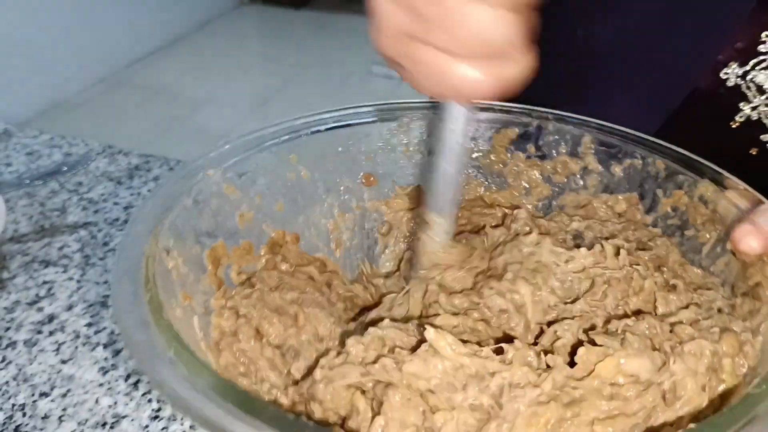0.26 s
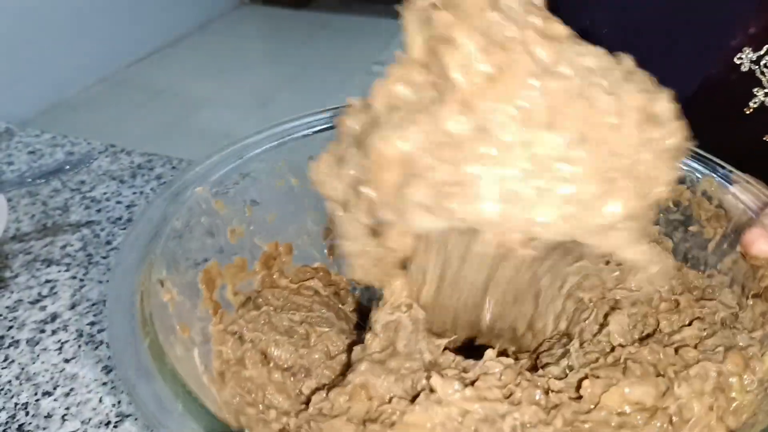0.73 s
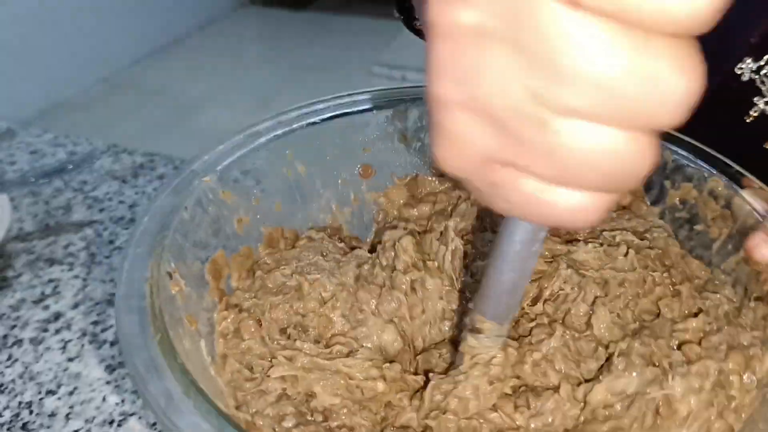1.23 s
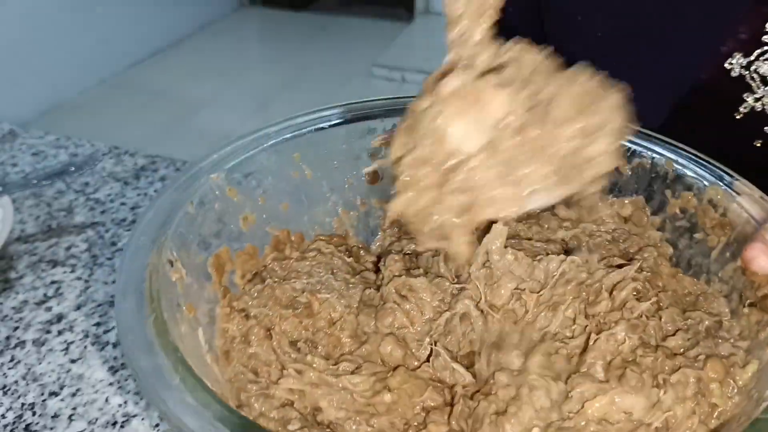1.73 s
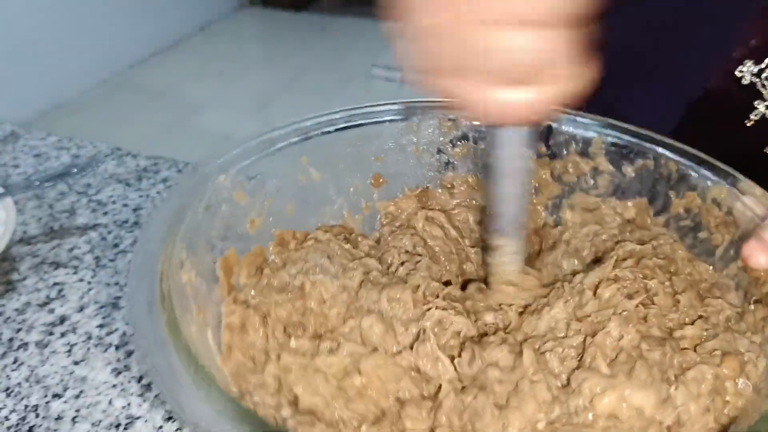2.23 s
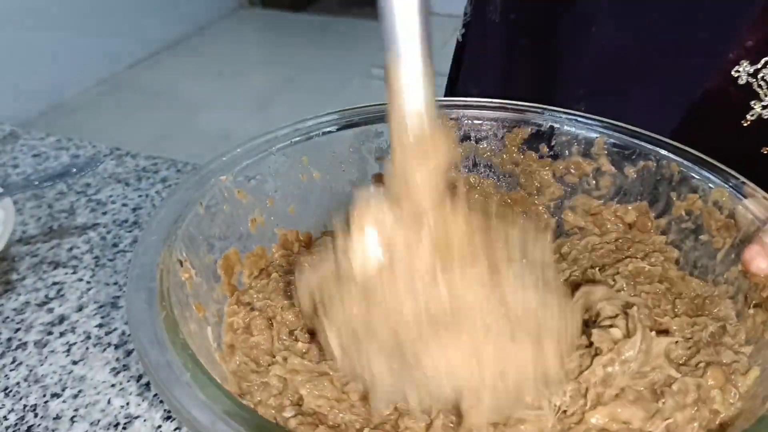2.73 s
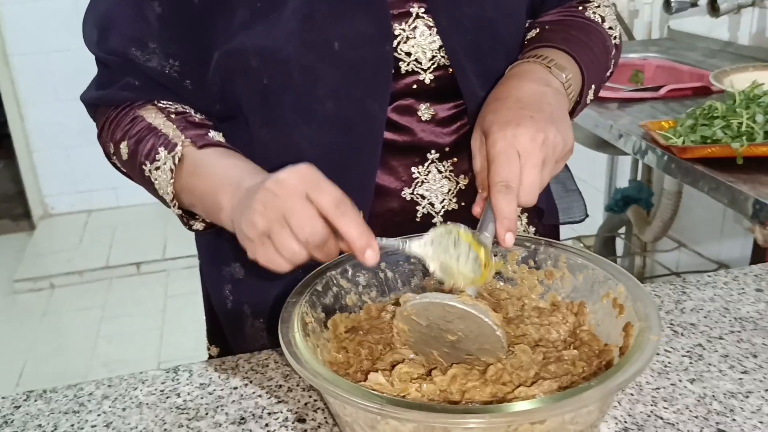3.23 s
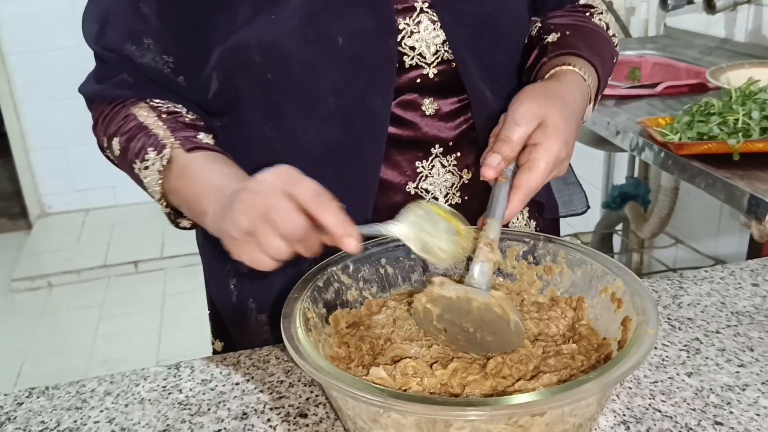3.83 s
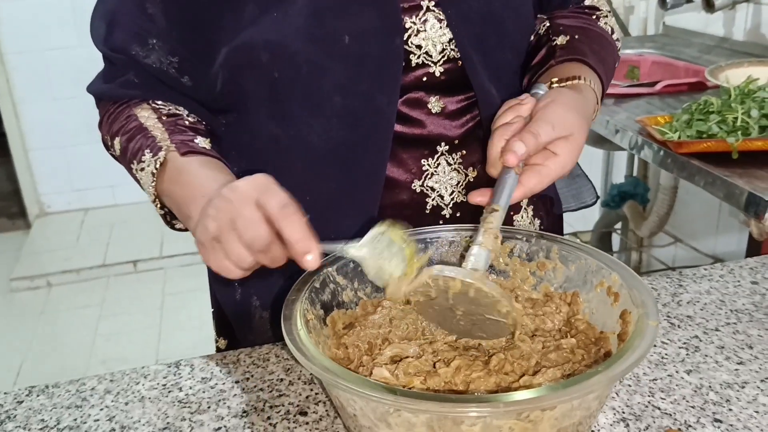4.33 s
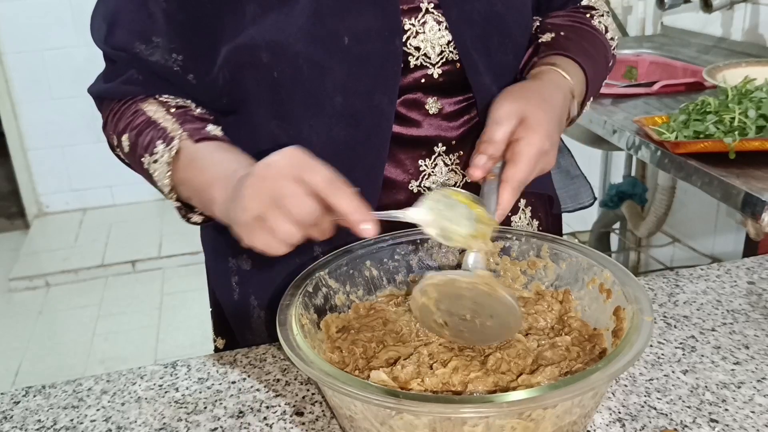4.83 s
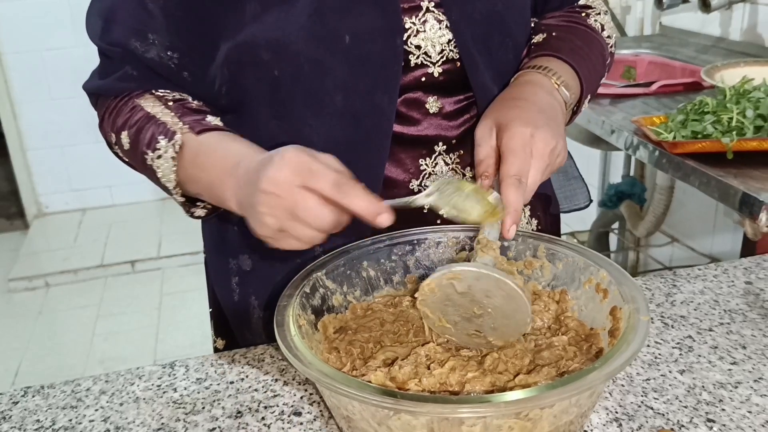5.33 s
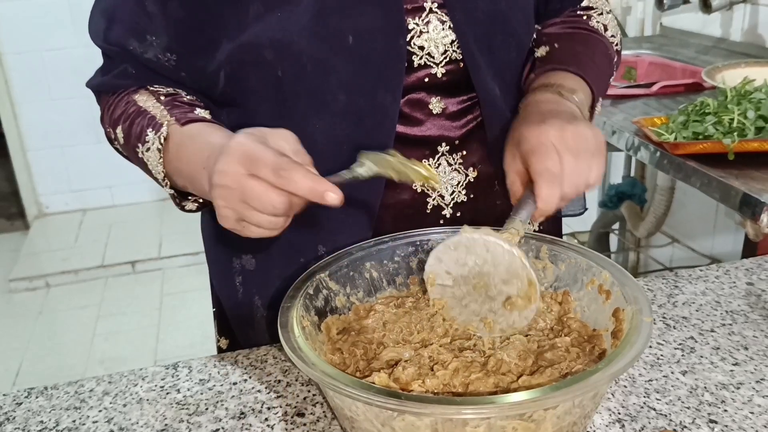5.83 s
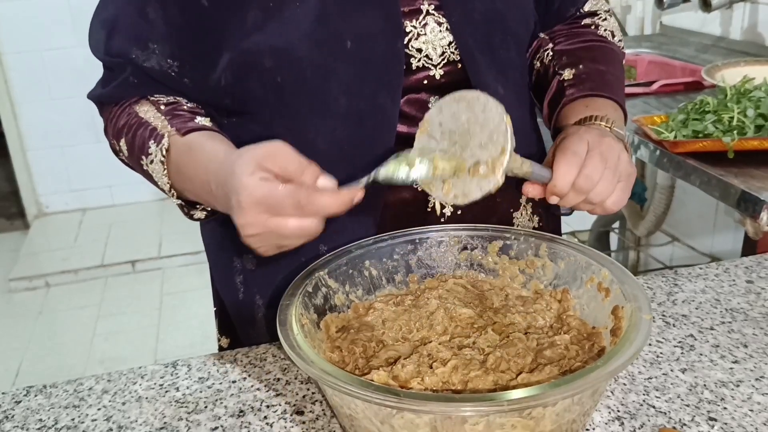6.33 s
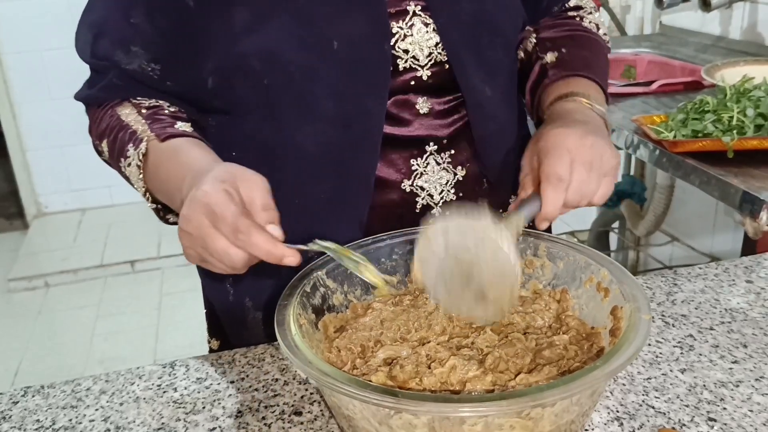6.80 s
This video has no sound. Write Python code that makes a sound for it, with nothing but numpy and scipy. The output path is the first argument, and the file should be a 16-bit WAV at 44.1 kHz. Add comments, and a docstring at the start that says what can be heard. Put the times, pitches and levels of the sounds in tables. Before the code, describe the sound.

In a small tiled kitchen with low hum and hiss, a steel ladle pushes through thick sticky mash in a glass bowl, squelching, crackling and popping. It knocks the glass irregularly, one early blow hugely louder than the rest. Then the background abruptly changes tone and a small spoon scrapes the ladle in nine strokes, each a short damped clink and gritty scrape. Close stereo microphone.

```python
"""Over a low hum and hiss in a tiled kitchen, a steel ladle works thick mash in a glass bowl on a stone counter.
The mash squelches and pops, as torn grains and short bursts; the ladle knocks the glass, as fading tones.
A blow that overloads both channels together makes a limiter dip the level briefly.
Then the background abruptly changes colour, and a small spoon clears the ladle stroke by stroke:
each is a clink of fading steel tones deadened by mash, then a short gritty scrape of random tiny slips."""
import sys
import numpy as np
from scipy import signal
from scipy.fft import rfft, irfft, next_fast_len
from scipy.io import wavfile
from scipy.ndimage import uniform_filter1d, minimum_filter1d

SR = 44100
rng = np.random.default_rng(int(sys.argv[2]) if len(sys.argv) > 2 else 0)


def master(y):
    """Save y as 16-bit WAV."""
    cut = np.clip(np.atleast_2d(y).T, -1, 1)
    pcm = np.round(cut * 32767)  # scale
    wavfile.write(sys.argv[1], SR, pcm.astype(np.int16))


N = 311338  # length in samples
COLOUR_CHANGE_S = 2.8  # when the background noise changes colour and the mash stops ticking

# All levels are relative settings, which the mix below adds to.
# spoon landing on the ladle, once a stroke: start_s, level_db, ring_hz, ring_level_db, brightness_db
SPOON_LANDINGS = [(2.8459, -17.5, 5360, -4.5, 3.5), (3.2848, -9.5, 4800, -13.5, -1.5),
                  (3.5775, -10.5, 5430, -2, -2.5), (3.9002, -8, 5400, -11, 1),
                  (4.187, -13.5, 5480, -11, -1), (4.5292, -10.5, 5480, -4, -1.5),
                  (4.9242, -19.5, 4350, -6, -9.5), (5.4011, -14.5, 4360, 9, 0.5),
                  (6.284, -7.5, 4600, -10, 1)]
# the slide after each landing: start_s, end_s, level_db, easing_in_mid_slide_db, brightness_db
SPOON_SLIDES = [(2.938, 2.997, -28, 6.5, -5), (3.314, 3.37, -27.5, 17, 0.5), (3.631, 3.699, -25.5, 3, -1),
                (3.924, 3.996, -32, -1.5, -23), (4.233, 4.31, -30, -6, -11), (4.557, 4.6, -23, 3, -6),
                (4.995, 5.029, -28, -0.5, -3), (5.429, 5.477, -33, 2, -4), (6.346, 6.397, -23.5, -1, 7.5)]
# high tones of the mash-coated steel: pitch_hz, level_db, time_to_fade_60_db_s
STEEL_HIGH_TONES = [(5930, 11, 0.0056), (7580, 6.5, 0.021), (8220, 4.5, 0.025), (9500, -9, 0.014),
                    (11400, -16, 0.027)]
# highest tones of the same steel: pitch_hz, level_db, time_to_fade_60_db_s
STEEL_HIGHEST_TONES = [(12260, -7.5, 0.025), (14300, 0, .01), (15800, -5, 0.029)]


def amp(db):
    """Turn decibels into a gain."""
    return 10 ** (np.asarray(db) / 20)


def unit(x):
    """Scale a sound to an rms (average strength) of 1."""
    return x / np.sqrt(np.mean(x ** 2) + 1e-20)


def along(points, hz):
    """Read a curve of (Hz, value) points, with pitch on a log scale."""
    point_hz, value = np.transpose(points)
    return np.interp(np.log(hz + 1), np.log(point_hz + 1), value)


def filtered(x, response):
    """Multiply each frequency in a sound by the response at that frequency."""
    size = next_fast_len(x.shape[-1] + 8192)
    hz = np.fft.rfftfreq(size, 1 / SR)
    return irfft(rfft(x, size) * response(hz), size)[..., :x.shape[-1]]


def coloured(x, spectrum):
    """Shape a sound by (Hz, dB) points and bring it to rms 1."""
    return unit(filtered(x, lambda hz: amp(along(spectrum, hz))))


def add(track, start_s, sound):
    """Mix a sound into a track from a given time."""
    part = track[..., max(round(start_s * SR), 0):][..., :sound.shape[-1]]
    part += sound[..., :part.shape[-1]]


def panned(x, pan_db):
    """Share a sound between left and right; a positive pan favours the left."""
    return x * amp([[pan_db / 2], [-pan_db / 2]])


def ring(modes, attack=0.0004, spread=0.92, crack_db=-20, detune=0.0093):
    """One blow of peak about 1: a noisy contact crack and fading tones, shifted a little by grip and load."""
    t = np.arange(SR // 4) / SR
    out = amp(crack_db - 60 * t / 0.004) * rng.standard_normal((2, len(t)))
    for hz, db, t60 in modes:
        # the two ports hear each tone a little out of step
        phase = rng.uniform(0, 2 * np.pi) + spread * rng.standard_normal((2, 1))
        pitch = hz * np.exp(detune * rng.standard_normal())
        level = db + 2.0 * rng.standard_normal()
        out += amp(level - 60 * t / t60) * np.sin(2 * np.pi * pitch * t + phase)
    out *= 1 - np.exp(-t / attack)
    # little sound leaves below the lowest tone
    b, a = signal.butter(2, modes[0][0] / 2, "high", fs=SR)
    out = signal.lfilter(b, a, out)
    return out / np.abs(out).max(axis=1).mean()


def shifted(modes, octaves):
    """The same tones, higher or lower."""
    return [(hz * 2 ** octaves, db, t60) for hz, db, t60 in modes]


def grains(rate, scatter_db, apart, size=N):
    """Random tiny clicks of uneven size, rate per second, partly unlike at the two ports."""
    happens = rng.random(size) < rate / SR
    sizes = happens * amp(scatter_db * np.minimum(rng.exponential(size=size), 4))
    signs = rng.choice([-1, 1], size) + apart * rng.standard_normal((2, size))
    return unit(sizes * signs)


def air(spectrum):
    """Steady hum and hiss: noise with a few resonances, most alike in both ears near 180 Hz."""
    # bumps and dips: centre_hz, width_hz, level_db
    resonances = [(211, 11.2, 6.5), (258, 11, 2.5), (1390, 460, -3), (5370, 140, 3), (6600, 250, -8.5),
                  (7980, 870, 14)]
    # how alike left and right are: pitch_hz, likeness (1 is the same)
    likeness = [(60, 0.25), (180, 1), (550, 0.43), (1200, 0.011), (5000, 0.055)]

    def colour(hz):
        bumps_db = sum(db / (1 + ((hz - centre) / width) ** 2) for centre, width, db in resonances)
        return amp(along(spectrum, hz) + bumps_db)

    def mid_and_side(hz):
        turn = np.arccos(np.clip(along(likeness, hz), 0, 1)) / 2
        return colour(hz) * [np.cos(turn), np.sin(turn)]

    mid, side = filtered(rng.standard_normal((2, N)), mid_and_side)
    return unit(np.array([mid + side, mid - side]))


def background():
    """The room's noise has one colour at first and abruptly takes on another."""
    # noise before the change: pitch_hz, level_db
    first_curve = [(15, -52), (25, -49), (53, -21), (263, -2.5), (489, -11), (607, -18), (659, -16.5),
                   (1070, -14), (1230, -7.5), (2110, -16.5), (2410, -9.5), (2910, -16), (6210, -23.5),
                   (7710, -38.5), (16000, -44)]
    # noise after the change: pitch_hz, level_db
    second_curve = [(15, -70), (25, -49), (102, -19.5), (130, -8), (157, -13), (212, -6), (326, -11.5),
                    (677, -15), (911, -20.5), (1100, -9.5), (3720, -18), (5280, -18.5), (6560, -27),
                    (7920, -35.5), (16000, -46)]
    changed = np.clip((np.arange(N) / SR - COLOUR_CHANGE_S) / 0.01, 0, 1)
    first = amp(-47.0) * panned(air(first_curve), pan_db=-2)
    second = amp(-48.0) * panned(air(second_curve), pan_db=-2.0)
    return np.sqrt(1 - changed) * first + np.sqrt(changed) * second


def kitchen(x, wet_db, early_db):
    """Counter and tiles throw back a few early echoes, then a tail whose highest treble dies first."""
    # how long the tail takes to fade by 60 dB: pitch_hz, time_s
    fade_times = [(150, 0.47), (1000, 0.37), (3000, 0.29), (8000, 0.3), (15000, 0.14)]
    hz, t, noise = signal.stft(rng.standard_normal((2, SR // 2)), SR, nperseg=256)
    fade = amp(-60 * t / along(fade_times, hz)[:, None])
    rise = np.clip(t / 0.001, 0, 1) ** 2
    tail = signal.istft(noise * fade * rise, SR, nperseg=256)[1]
    answer = amp(wet_db) * tail / np.linalg.norm(tail[0])
    for channel in answer:
        delays = rng.uniform(.007, .024, size=8)  # s
        channel[(delays * SR).astype(int)] += amp(early_db) * rng.choice([-1, 1], size=8)
    return x + signal.fftconvolve(x, answer, axes=1)[:, :N]


def bubbles(rate, centre_hz, scatter_db, cycles):
    """Tiny sticky films snapping, each a few cycles at its own pitch and place."""
    count = int(rate * N / SR)
    start, size, pitch, side = rng.random((count, 4)).T[..., None]
    hz = np.minimum(centre_hz * 2 ** (2.4 * (pitch - .5)), SR / 2)
    age = np.arange(96) / SR
    level_db = -scatter_db * np.log(size + 0.0067) - 60 * age * hz / cycles
    snaps = amp(level_db) * np.sin(2 * np.pi * hz * age)
    where = ((start * N).astype(int) + np.arange(len(age))).ravel()
    channels = [np.bincount(where, (snaps * share).ravel(), N)[:N] for share in (side, 1 - side)]
    return unit(np.array(channels))


def mash():
    """Each push tears the mash: a dull squelch under wet crackle, with short pops and one faint ladle tick."""
    # ladle pushing through the mash: strongest_at_s, length_s, crackle_db, squelch_db
    pushes = [(.13, 0.083, -46, -56), (0.262, 0.063, -58, -45.5), (0.49, 0.06, -41, -33),
              (0.597, 0.13, -53, -62), (1.03, 0.13, -53, -52), (1.47, 0.047, -43.5, -45.5),
              (1.908, 0.015, -37, -29), (2.103, 0.094, -56, -45), (2.451, 0.12, -45, -47.5)]
    # short pops at set times, the last a faint ladle tick: start_s, level_db, pitch_hz
    set_pops = [(0.161, -29.5, 5100), (1.0523, -35, 6010), (1.5708, -30.5, 6700), (1.971, -24, 6400),
                (1.9827, -27, 4450), (2.0858, -29, 3400)]
    # tone colour of the crackle: pitch_hz, level_db
    crackle_curve = [(100, -55), (1500, -23), (3000, -11), (6000, 6), (9000, 6.5), (15000, -19)]
    # tone colour of the squelch: pitch_hz, level_db
    squelch_curve = [(30, -50), (100, -25), (250, 4), (500, -6), (900, 0.5), (1500, -2), (2200, -6),
                     (3000, 6), (3800, -9), (8000, -28)]
    rise_share = 0.44  # part of a push spent building up; the rest is the mash settling
    # further air pockets open at random within this time after a push
    pocket_db, pocket_hz, pocket_lag_s = -30.5, 4140, 0.12

    t = np.arange(N) / SR
    crackle, squelch, pops = np.zeros(N), np.zeros(N), np.zeros((2, N))
    all_pops = list(set_pops)
    chances = rng.random((len(pushes), 3))
    for (s, length, crackle_db, squelch_db), (late, size, pitch) in zip(pushes, chances):
        push = np.exp(-np.maximum((s - t) / rise_share, (t - s) / (1 - rise_share)) / length)
        crackle += amp(crackle_db) * push
        squelch += amp(squelch_db) * push
        pop_db = pocket_db + 6 * (size - .5)
        all_pops.append((s + pocket_lag_s * late, pop_db, pocket_hz * 2 ** (pitch - .5)))
    for s, db, hz in all_pops:
        add(pops, s, amp(db + 3.5) * ring([(hz, 0, .005)], attack=0.00025, spread=1.0, crack_db=-5))

    fine = crackle * coloured(grains(rate=1200, scatter_db=-2, apart=1.0), crackle_curve)
    # the stirred mash keeps ticking faintly between pushes
    stickiness = amp(-9.5) * crackle + amp(-64) * (t < COLOUR_CHANGE_S)
    sticky = stickiness * bubbles(rate=250, centre_hz=6960, scatter_db=3.5, cycles=5.2)
    dull = squelch * coloured(grains(rate=2500, scatter_db=4.5, apart=0.59), squelch_curve)
    return panned(fine + sticky + pops, pan_db=-1.5) + panned(dull, pan_db=-2.5)


def knocks():
    """The ladle clacks on glass; weight adds the bowl's hollow knock and thud, wetness a tick and a mash snap."""
    # ladle on the bowl: start_s, level_db, weight_behind_blow_db, wetness_db, left_over_right_db
    blows = [(0.2191, -30.5, -23, -17.5, -7), (0.4584, -37, -19, -14, -10), (1.0173, -16, -30, -19, -1.5),
             (1.1871, 5, -18.5, -25, 3.5), (1.4408, -27, -43, -21, 0), (1.9113, -29.5, -28, -1, -5),
             (2.1191, -23.5, 0.5, -16.5, -7), (2.39, -22, -36, -13.5, 4.5)]
    # tones of the loaded bowl, from low to high: pitch_hz, level_db, time_to_fade_60_db_s
    thud_tones = [(161, -27, .1), (216.4, -12, 0.12), (272.4, -0.5, 0.092), (355, -11.5, 0.14)]
    knock_tones = [(420, 0, 0.025), (489, -2, 0.034), (611, -6, 0.038), (1130, 3.5, 0.013),
                   (1310, 4.5, 0.012)]
    clack_tones = [(1426, -12.5, 0.027), (2050, 6.5, 0.0022), (2430, 4.5, 0.011), (2660, 1, 0.013),
                   (3080, 0.5, 0.014), (3550, 0.5, 0.0098)]
    tick_tones = [(4170, -1.6, 0.0094), (4840, 1.5, 0.0046), (5200, -0.5, 0.0073), (6030, 0.43, 0.0078)]
    # film of mash snapping under the ladle: pitch_hz, level_db, time_to_fade_60_db_s
    snap_tones = [(8200, 12, 0.0047), (9940, 0, 0.0069), (13000, -17, .003)]
    clack_octaves_per_db = .011  # a harder blow has a shorter contact and clacks higher
    # a ladle that bears down harder than usual loads the glass and lowers its knock
    sag_octaves_per_db, usual_weight_db = .009, -10
    knock_per_weight = 0.58  # dB of hollow knock per dB of weight

    out = np.zeros((2, N))
    for s, db, weight_db, wet_db, pan_db in blows:
        hardened = shifted(clack_tones, clack_octaves_per_db * db)
        clack = amp(0.5) * ring(hardened, attack=0.00036, spread=0.059, crack_db=-19, detune=0.031)
        thud = amp(weight_db) * ring(thud_tones, attack=0.0017, spread=0.26, crack_db=-19)
        loaded = shifted(knock_tones, sag_octaves_per_db * (usual_weight_db - weight_db))
        knock_db = knock_per_weight * weight_db + 3.5
        knock = amp(knock_db) * ring(loaded, attack=0.0009, spread=0.22, crack_db=-35)
        tick = amp(wet_db + 15.0) * ring(tick_tones, attack=0.00023, spread=0.22, crack_db=-8, detune=0.099)
        snap = amp(wet_db + 7.5) * ring(snap_tones, attack=0.00028, spread=0.49, crack_db=-7, detune=0.044)
        high = panned(clack + tick + snap, pan_db)
        low = panned(thud + knock, pan_db=2.5)
        add(out, s, amp(db) * (high + low))
    return out


def pressed(t, start, end):
    """1 while the spoon bears on the ladle, with a short ramp at each end."""
    return np.clip(np.minimum(t - start, end - t) / 0.0045 + 0.5, 0, 1)


def scrapes():
    """The spoon drags lightly, then its rim sticks and slips; the upper ring takes over as it slides outwards."""
    # tone colour of the grit: pitch_hz, level_db
    grit_curve = [(300, -29), (700, -35), (1250, -7.5), (1750, -15.5), (2200, 0), (2700, 4.5), (3600, 2.5),
                  (4100, -2), (5200, -2.5), (6200, -16.5), (7000, -5.5), (9000, -47), (15000, -51)]
    # light rubbing before the slide: level after a 0 dB landing, dB per dB of landing
    drag_db, drag_grows = -24.5, 1.59
    # a duller slide has a lower ring
    slide_hz, slide_hz_per_db = 3280, 32
    upper_per_db = -0.1  # dB of upper ring per dB of brightness
    slide_brightens_db = 5  # from start to end, as the steel is wiped bare
    # the pressed rim damps the high tones
    damped = [(hz, level, t60 / 2) for hz, level, t60 in STEEL_HIGH_TONES]

    out = np.zeros((2, N))
    for (landing, landing_db, *_), (start, end, db, ease_db, bright_db) in zip(SPOON_LANDINGS, SPOON_SLIDES):
        t = landing + np.arange(SR // 5) / SR
        travel = np.clip((t - start) / (end - start), 0, 1)
        drag = amp(drag_db + drag_grows * landing_db) * pressed(t, landing, start)
        slide = amp(db - ease_db * np.sin(np.pi * travel) ** 2) * pressed(t, start, end)
        # slips come in flurries
        flurry = amp(2.2 * unit(uniform_filter1d(rng.standard_normal(len(t)), size=120)))
        slips = flurry * grains(rate=2200, scatter_db=0.5, apart=0.5, size=len(t))

        def shaken(answer):
            """Let every slip set the steel ringing."""
            return unit(signal.fftconvolve(slips, answer, axes=1)[:, :len(t)])

        shift_db = 7 * (travel - .5)
        edge_db = bright_db + slide_brightens_db * (travel - .5)
        lower_hz = slide_hz + slide_hz_per_db * bright_db
        lower = amp(-7.0 - shift_db / 2) * shaken(ring([(lower_hz, 0, .0048)]))
        upper_db = -8.5 + upper_per_db * bright_db + shift_db
        upper = amp(upper_db) * shaken(ring([(4538, 0, 0.013)], detune=0.044))
        edge = amp(-13.5 + edge_db) * shaken(ring(damped, attack=.0001, crack_db=-10, detune=0.021))
        shimmer = amp(-18 + edge_db) * shaken(ring(STEEL_HIGHEST_TONES, attack=.0001, crack_db=28))
        grit = amp(-4.0) * coloured(slips, grit_curve)
        add(out, landing, (drag + slide) * (lower + upper + edge + shimmer + grit))
    return panned(out, pan_db=-2.5)


def clink(ring_hz, ring_db, bright_db):
    """Steel touches steel; where it lands sets the pitch of the main ring and how bright the blow is."""
    # middle tones of the mash-coated steel: pitch_hz, level_db, time_to_fade_60_db_s
    body_tones = [(1330, -25, 0.012), (1950, -15.5, 0.011), (2737, -2, 0.0079), (3280, 3, 0.0099),
                  (3717, 2, 0.0069)]
    body = amp(2.5) * ring(body_tones, attack=0.0004, spread=0.56, crack_db=-9, detune=0.031)
    main = amp(ring_db + 0.5) * ring([(ring_hz, 0, .017)], attack=0.00033, spread=0.27, crack_db=-22)
    edge = ring(STEEL_HIGH_TONES, attack=0.000081, spread=0.39, crack_db=-6, detune=0.038)
    edge *= amp(-2 + bright_db)
    shimmer = ring(STEEL_HIGHEST_TONES, attack=0.00023, spread=0.65, crack_db=7, detune=0.0096)
    # the highest tones grow faster than the brightness
    shimmer *= amp(-4 + 2.8 * bright_db)
    return panned(body + main + edge + shimmer, pan_db=-2.5)


def clinks():
    """In every stroke the spoon lands on the ladle, then its rim catches once more as it starts to slide."""
    bite_s, bite_db = .006, 6.5  # the catch: delay after the slide starts, level over the slide setting
    out = np.zeros((2, N))
    for s, db, ring_hz, ring_db, bright_db in SPOON_LANDINGS:
        add(out, s, amp(db) * clink(ring_hz, ring_db, bright_db))
    for start, _, db, _, _ in SPOON_SLIDES:
        add(out, start + bite_s, amp(db + bite_db) * clink(4350, ring_db=-6, bright_db=-10))
    return out


def scene():
    """Bowl and cutlery in the kitchen, their treble reaching mostly the right port, over the background."""
    # left port facing away: pitch_hz, level_db
    left_curve = [(1000, 2.5), (3200, -4), (4500, -2), (5500, 6), (8000, -13), (11000, -10), (13200, -3),
                  (15500, -13)]
    left_lag_s = .00004  # sound reaches the left port later

    def facing_away(hz):
        return amp(along(left_curve, hz)) * np.exp(-2j * np.pi * hz * left_lag_s)

    bowl = kitchen(knocks() + mash(), wet_db=-12.5, early_db=-26)
    cutlery = kitchen(clinks() + scrapes(), wet_db=-8.5, early_db=-22.5)
    left, right = bowl + cutlery
    return np.array([filtered(left, facing_away), right]) + background()


def record(dry):
    """A limiter holds the level down after both ports overload together; nothing passes above the band limit."""
    top_hz = 16300
    needed = np.minimum(1, 1.01 / (np.abs(dry.mean(axis=0)) + 1e-9))
    hold = SR // 4 | 1  # about a quarter second, in samples
    held = minimum_filter1d(needed, hold, origin=hold // 2 - 64)
    gain = uniform_filter1d(held, size=64)
    return filtered(np.clip(dry * gain, -1, 1), lambda hz: hz < top_hz)


dry = scene()
out = record(dry)
master(out)
```